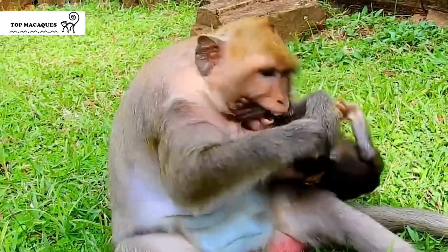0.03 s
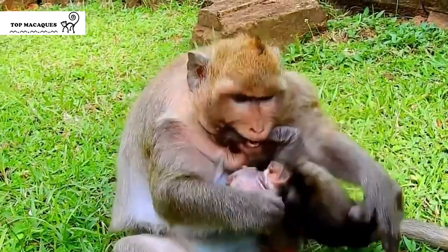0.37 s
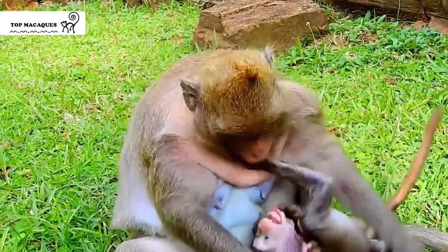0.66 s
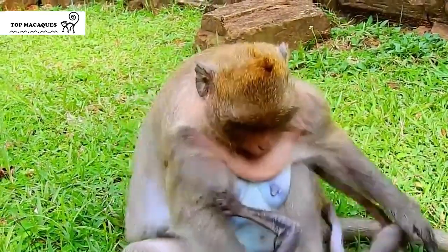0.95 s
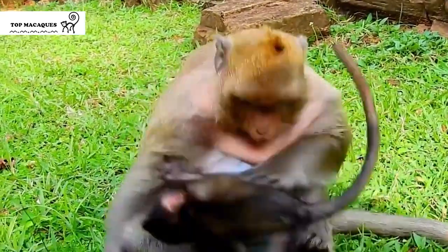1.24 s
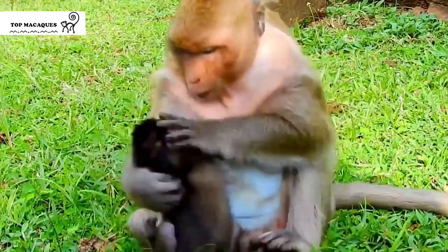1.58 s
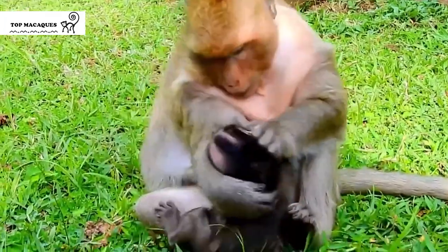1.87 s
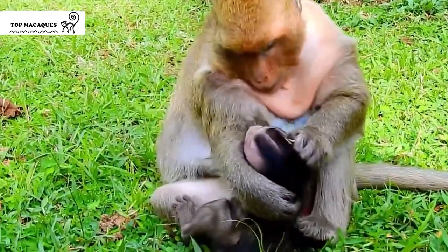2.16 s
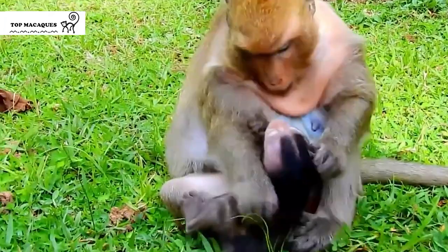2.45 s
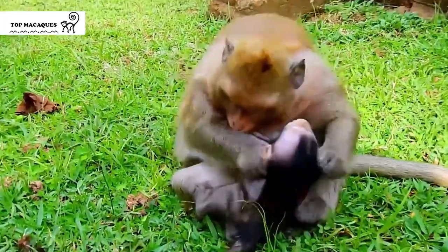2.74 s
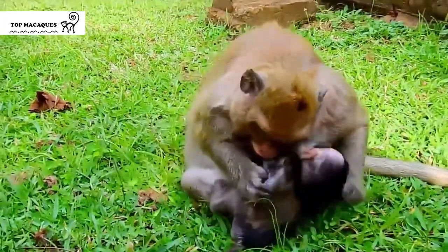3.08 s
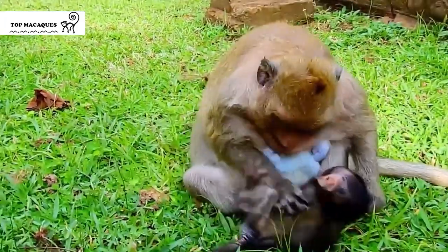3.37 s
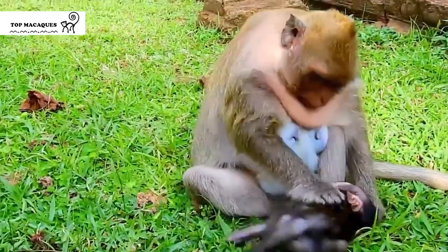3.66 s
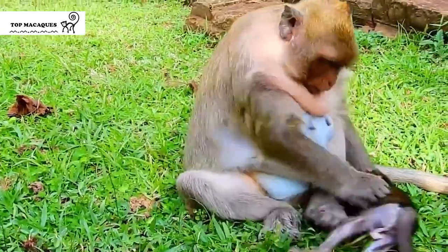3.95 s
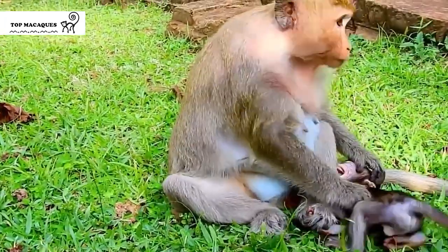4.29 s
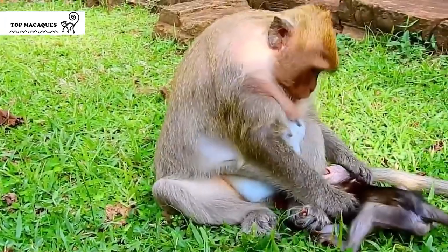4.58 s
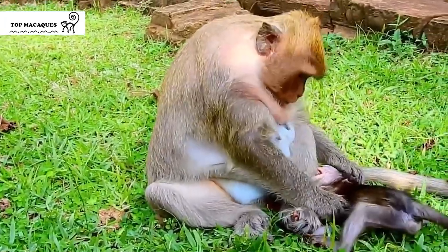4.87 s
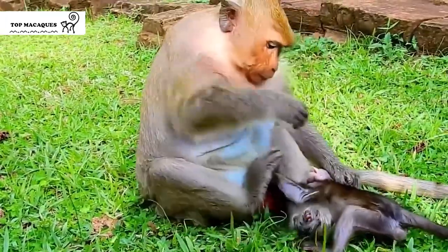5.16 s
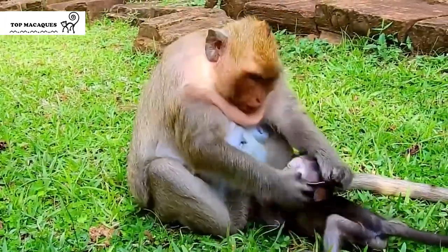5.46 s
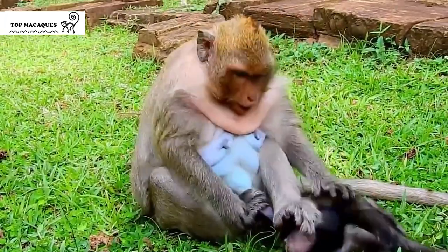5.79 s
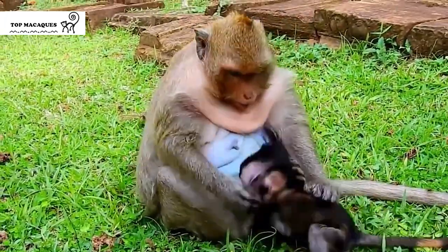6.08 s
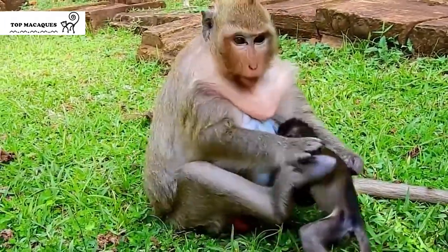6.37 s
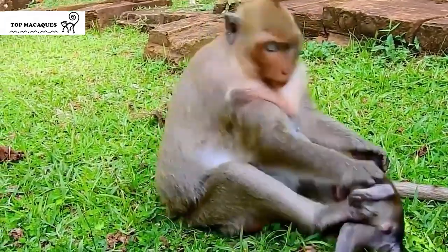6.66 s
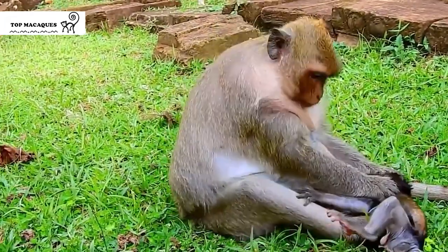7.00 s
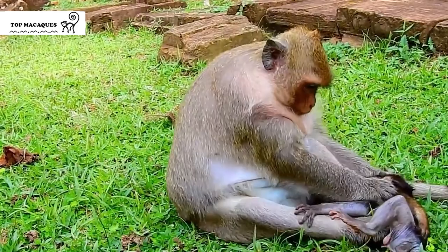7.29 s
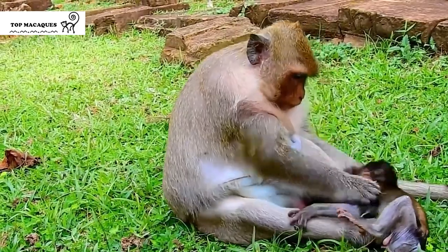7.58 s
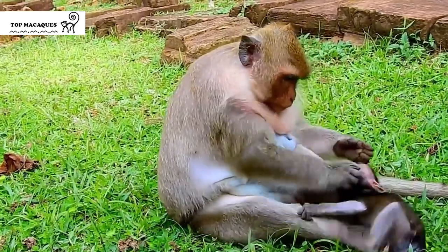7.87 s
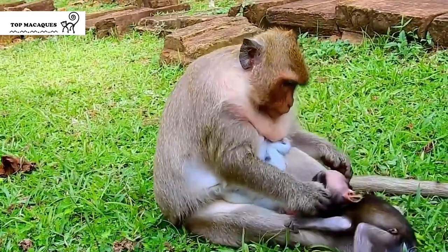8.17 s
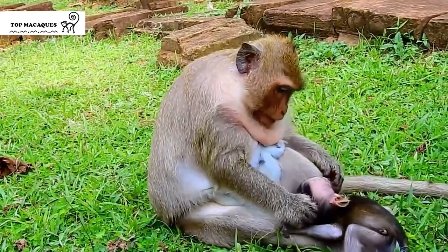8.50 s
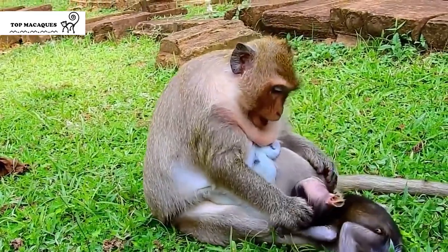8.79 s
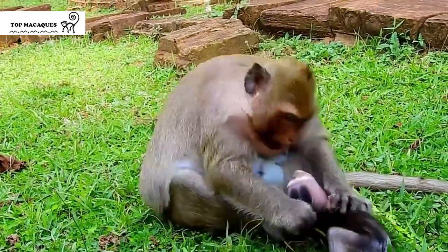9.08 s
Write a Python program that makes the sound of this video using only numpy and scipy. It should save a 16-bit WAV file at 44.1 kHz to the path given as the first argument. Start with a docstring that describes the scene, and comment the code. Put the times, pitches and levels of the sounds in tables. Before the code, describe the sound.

An infant monkey cries nearby outdoors, its piercing, whistle-like squeals and screams wavering in pitch and turning hoarse. The cries come in three bouts with a slight echo, and three dry clicks poke through the first two. The gaps hold a faint low rumble, grass rustle and a few scuffs. Near the end there is a short knock, and the voice dwindles to two small squeaks.

```python
"""An open lawn, close to a stereo microphone: an infant macaque, held down by an adult, squeals and
screams, ending with two small squeaks. Each call is a gliding whistle, loudest in the middle of its
range, that now and then breaks into rasping chaos; the surroundings answer with a short echo.
Behind it are a dull outdoor wash and a few knocks and scuffs, which a limiter ducks under the screams.
Three sharp clicks cut through the calls."""
import sys
import numpy as np
from scipy import signal
from scipy.fft import rfft, irfft
from scipy.io import wavfile
from scipy.ndimage import uniform_filter1d, map_coordinates

SR = 44100
rng = np.random.default_rng(int(sys.argv[2]) if len(sys.argv) > 2 else 0)


def bounce(signal):
    """Save signal as a 16-bit WAV file at the path given by the first command-line argument."""
    frames = np.transpose(np.atleast_2d(signal))
    limited = np.clip(frames, -1, 1)
    pcm = np.round(limited * 32767).astype(np.int16)
    wavfile.write(sys.argv[1], SR, pcm)


N = 411894
TIME = np.arange(N) / SR
OPPOSED = np.array([[1], [-1]])  # left, right


def amp(db):
    """Decibels to gain."""
    return 10 ** (np.asarray(db) / 20)


def unit_rms(x):
    """Scales to rms 1."""
    return x / np.sqrt(np.mean(x ** 2) + 1e-20)


def add(mix, start_s, sound):
    """Mixes a sound in at start_s."""
    part = mix[max(round(start_s * SR), 0):][:len(sound)]
    part += sound[:len(part)]


def coloured_noise(spectrum):
    """Noise shaped by (freq_hz, level_db) points, falling 20 dB an octave beyond them."""
    hz, db = np.transpose(spectrum)
    f = np.fft.rfftfreq(N, 1 / SR) + 1
    octaves_outside = np.maximum(np.log2(f / hz[-1]), 0) + np.maximum(np.log2(hz[0] / f), 0)
    gain = amp(np.interp(np.log(f), np.log(hz), db) - 20 * octaves_outside)
    return unit_rms(irfft(rfft(rng.standard_normal(N)) * gain, N))


def wander(size, rate_hz):
    """Smooth random motion of rms 1, up to about rate_hz."""
    f = np.fft.rfftfreq(size, 1 / SR)
    return unit_rms(irfft(rfft(rng.standard_normal(size)) * (f > 0) / (1 + (f / rate_hz) ** 4), size))


def resonate(x, hz, width_hz):
    """A resonance of gain 1 at hz."""
    turn = np.exp(2j * np.pi * np.cumsum(np.full(len(x), hz)) / SR)
    pole = np.exp(-np.pi * width_hz / SR)
    return 2 * (turn * signal.lfilter([1 - pole], [1, -pole], x / turn)).real


def spread(make, side_db):
    """Two channels from a common part and a weaker opposed part."""
    return make() + amp(side_db) * make() * OPPOSED


# Spectra of the ambience around the microphone: freq_hz, level_db
RUMBLE_SPECTRUM = [(25, -27), (60, -9), (125, 2.5), (200, -7.5), (400, -22.5)]
WASH_SPECTRUM = [(100, -15.5), (260, -6), (750, -1), (1500, -10.5)]
RUSTLE_SPECTRUM = [(500, -17.5), (1000, -2.5), (1400, -1), (2000, -5), (3000, -8), (4300, -32), (7400, -32),
                   (9000, -47.5)]
# Slow swells of the ambience on the lawn: time_s, rumble_db, wash_db, rustle_db
AMBIENCE_SWELLS = [(.3, -48.5, -60, -48.5), (1.44, -55.5, -61.5, -49.5), (2.0, -50, -54, -45.5),
                   (2.602, -50, -50.5, -43), (3.15, -58, -56.5, -45.5), (4.099, -57, -55.5, -53),
                   (4.75, -61.5, -63.5, -64), (5.1, -57, -60.5, -59.5), (5.8, -65, -71.5, -68),
                   (6.699, -64.5, -66.5, -68), (7.4, -48.5, -51.5, -57), (8.0, -60, -68.5, -71.5),
                   (9.1, -62.5, -66, -65)]


def lawn_ambience():
    """Low rumble, a dull wash and an uneven rustle of grass, each swelling slowly, over faint hiss."""
    times, *levels = np.transpose(AMBIENCE_SWELLS)
    rumble_gain, wash_gain, rustle_gain = (amp(np.interp(TIME, times, db)) for db in levels)
    rumble_gain *= amp(2 * wander(N, 4.7) - 1.5)
    rumble = rumble_gain * spread(lambda: coloured_noise(RUMBLE_SPECTRUM), side_db=-25)
    wash_and_rustle = spread(lambda: wash_gain * coloured_noise(WASH_SPECTRUM)
                             + rustle_gain * coloured_noise(RUSTLE_SPECTRUM), side_db=-12)
    flutter = amp(1.8 * wander(N, 13) - 2)
    hiss_spectrum = [(3000, -4.5), (7000, -2), (8500, -22), (13000, -29)]
    hiss = amp(-81.5) * spread(lambda: coloured_noise(hiss_spectrum), side_db=-1.5)
    return rumble + wash_and_rustle * flutter + hiss


def surroundings(x, tail_db, near_db=-11, near_t60_s=.05, tail_t60_s=.31, treble_t60_s=.18):
    """Adds quick scatter from the ground and the bodies, then a thin tail from stones and trees."""
    t = np.arange(SR * 3 // 4) / SR
    echoes = lambda: rng.standard_normal(len(t)) * (rng.random(len(t)) < 3000 / SR) * (t > .001)
    unit_energy = lambda h: h / np.sqrt((h ** 2).sum(-1, keepdims=True))
    near = unit_energy(np.array([echoes(), echoes()]) * amp(-60 * t / near_t60_s))
    hz, when, bands = signal.stft(spread(echoes, side_db=-8), SR, nperseg=256)
    t60_s = np.interp(hz, [6000, 12000], [tail_t60_s, treble_t60_s])[:, None]
    tail = unit_energy(signal.istft(bands * amp(-60 * when / t60_s), SR, nperseg=256)[1][:, :len(t)])
    response = amp(near_db) * near + amp(tail_db) * tail
    return x + signal.fftconvolve(x[None], response, axes=1)[:, :N]


# Knocks and scuffs in the grass, behind the voice: start_s, level_db, centre_hz, width_hz, t60_s
KNOCKS = [(2.433, -35.5, 926, 705, 0.17), (2.492, -35, 1046, 916, 0.14), (4.643, -47, 1680, 1460, 0.12),
          (7.419, -18, 515, 296, 0.04), (7.862, -41, 2930, 2930, 0.082), (7.872, -34.5, 820, 1406, 0.03),
          (8.073, -50.5, 1380, 1383, 0.12), (8.329, -35.5, 2810, 599, 0.024),
          (8.933, -50.5, 1820, 1090, 0.19)]


def knock(start_s, level_db, centre_hz, width_hz, t60_s, rise_s=.00087):
    """A damped puff of contact noise."""
    t = np.arange(SR // 4) / SR
    contact = resonate(rng.standard_normal(len(t)), centre_hz, width_hz)
    body = unit_rms(resonate(contact, centre_hz, width_hz))
    return start_s, body * amp(level_db - 60 * t / t60_s) * (1 - np.exp(-t / rise_s))


# Breaks, where the infant's whistle gives way to rasp: start_s, length_s, roughness
VOICE_BREAKS = [(0.359, .006, 0.6), (0.379, 0.0046, 0.42), (.638, 0.031, .85), (0.818, 0.076, 0.99),
                (0.902, 0.048, 0.88), (1.079, 0.11, 0.9), (1.199, .06, .68), (1.262, .09, 0.88),
                (1.546, .02, 0.7), (3.245, .03, 1.03), (3.31, 0.019, 0.76), (3.363, 0.036, 0.97),
                (3.559, 0.047, 0.77), (3.627, .032, 0.96), (3.755, 0.037, .8), (3.914, 0.069, 0.79),
                (3.993, .055, 0.76), (4.18, .03, 1), (4.458, .1, 0.9), (5.892, .03, 0.58),
                (5.958, 0.091, 0.94), (6.04, .12, .97), (6.16, .06, 0.67), (6.369, .06, .8),
                (6.453, .035, .6), (6.514, 0.073, 0.61), (6.833, .155, 0.63), (7.253, .03, 0.69)]


def voice_breaks(t, edge_s=.01):
    """Roughness at times t: the voice takes edge_s to tip into a break and out again."""
    rough = np.max([depth * ((t >= s) & (t < s + length)) for s, length, depth in VOICE_BREAKS], axis=0)
    return uniform_filter1d(rough, size=round(edge_s * SR))


def effort_db(t, hz, level_db, attack_s, release_s=.021, easy_hz=5480):
    """A call swells, wavers and is choked off, louder in breaks and weaker away from its easy pitch."""
    swell = -20.5 * np.maximum(1 - (t - t[0]) / attack_s, 0)
    release = -25.5 * np.maximum(1 - (t[-1] - t) / release_s, 0)
    push = 2 * voice_breaks(t)
    waver = 1.38 * wander(len(t), 25)
    thinning = np.where(hz > easy_hz, 60, 27) * np.log2(hz / easy_hz) ** 2
    return level_db + swell + release + push + waver - np.minimum(thinning, 31.5)


# What the infant's throat lets through: freq_hz, gain_db
THROAT_RESPONSE = [(4000, -2.5), (6300, 8.5), (7800, -1), (9000, -5), (10500, -12), (12000, -14.5),
                   (15000, -30)]


def rasp(t, pitch_hz, rough, mouth_hz, core_width_hz=800, mouth_width_hz=380):
    """Chaotic vibration: a fuzzy core on the pitch, fleeting sidebands, the mouth's lowest resonance."""
    f, when, bands = signal.stft(rng.standard_normal(len(t) + 256), SR, nperseg=256, noverlap=192)
    f, when = f[:, None] + 1, when + t[0]
    offset_hz = f - np.interp(when, t, pitch_hz)
    chaos, resonance_hz = np.interp(when, t, rough), np.interp(when, t, mouth_hz)
    core_db = 12 * (1 - chaos / 2) * np.exp(-(offset_hz / core_width_hz) ** 2 / 2)
    mouth_db = 9 * chaos * np.exp(-((f - resonance_hz) / mouth_width_hz) ** 2)
    # under that resonance the rasp drops steeply to a faint shelf
    cut_db = np.clip(110 * np.log2((resonance_hz - mouth_width_hz) / f), 0, 37)
    # sidebands ride with the pitch, each some 450 Hz wide and 20 ms long
    grid = np.broadcast_arrays(offset_hz / 450, when / .02)
    sideband_db = 8.5 * map_coordinates(rng.standard_normal((64, 64)), grid, order=3, mode="grid-wrap")
    shape_db = np.interp(f, *np.transpose(THROAT_RESPONSE)) + core_db + mouth_db - cut_db + sideband_db
    noise = signal.istft(bands * amp(shape_db), SR, nperseg=256, noverlap=192)[1][:len(t)]
    steady = noise / np.sqrt(abs(uniform_filter1d(noise ** 2, size=400)) + 1e-20)
    sputter = amp(1.5 * wander(len(t), 1100))
    return unit_rms(steady * sputter)


def cry(t, hz, mouth_hz, level_db, attack_s, hoarseness, overtone_db, doubling_db):
    """The vocal folds whistle, jitter, double their period and break into a sputtering rasp."""
    size = len(t)
    rough = np.clip(np.maximum(hoarseness, voice_breaks(t)), 0, 1)
    quaver = .011 * wander(size, 75)
    jitter = rough * (.05 * wander(size, 500) + .076 * wander(size, 110))
    phase = 2 * np.pi * np.cumsum(hz * (1 + quaver + jitter)) / SR
    throat_db = np.interp(2 * hz, *np.transpose(THROAT_RESPONSE))
    overtone = amp(overtone_db + throat_db + 2 * wander(size, 50)) * np.sin(2 * phase)
    shimmer = amp(3 * wander(size, 83))
    whistle = shimmer * np.sin(phase) + overtone
    # when half the pitch meets the mouth's resonance, cycles alternate strong and weak
    mistuning = (hz / 2 - mouth_hz) / 550
    doubling = amp(doubling_db) * np.exp(-mistuning ** 2) * (1 + wander(size, 490)) / 2
    whistle += doubling * (np.sin(phase / 2) + .3 * np.sin(1.5 * phase))
    voice = np.sqrt(1 - rough ** 2) * unit_rms(whistle) + rough * rasp(t, hz, rough, mouth_hz)
    fades = signal.windows.tukey(size, min(.007 * SR / size, 1))
    return t[0], voice * amp(effort_db(t, hz, level_db, attack_s)) * fades


# Short squeals near the microphone: start_s, length_s, level_db, attack_s, top_hz, end_hz, overtone_db
SQUEALS = [(0.298, 0.033, -30, 0.0046, 6500, 5000, -19), (0.42, 0.033, -20, 0.0038, 4630, 3950, -10.5),
           (0.613, 0.07, -19.5, 0.0025, 6360, 4720, -12.5), (0.81, 0.08, -13.5, 0.024, 5946, 4390, -18.5),
           (0.898, .05, -4, .004, 6300, 4200, -17), (1.469, 0.1, -7.5, 0.071, 6990, 4657, -8),
           (3.17, 0.032, -19, .012, 6290, 5680, -9), (5.863, 0.037, -15, 0.0067, 6950, 6170, -9.5),
           (7.215, 0.063, -12.5, 0.031, 5360, 3970, -16), (8.009, 0.046, -44, 0.012, 6220, 5660, -26),
           (9.187, 0.041, -35, 0.018, 5490, 4300, -6)]


def squeal(start_s, length_s, level_db, attack_s, top_hz, end_hz, overtone_db, rounding=.16):
    """One arch of pitch: it crests as the effort builds and sinks steadily as the air runs out."""
    t = np.arange(0, length_s, 1 / SR)
    crest = min(.46 * attack_s / length_s, .5)
    sag = np.hypot(t / length_s - crest, rounding) - rounding
    hz = top_hz - (top_hz - end_hz) * sag / sag[-1]
    mouth_hz = np.full(len(t), 4350)
    return cry(start_s + t, hz, mouth_hz, level_db, attack_s,
               hoarseness=.11, overtone_db=overtone_db, doubling_db=-12.5)


# Wavering screams near the microphone: level_db, attack_s, hoarseness, doubling_db,
# mouth_path [(time_s, resonance_hz)], pitch_turns [(time_s, pitch_hz)]
SCREAMS = [(-2.5, .045, 0.052, -21.5, [(.35, 4510)], [(.328, 5260), (.35, 5410), (.375, 4850), (.398, 5340),
           (.414, 4340)]), (-8, .004, .12, -16, [(1.13, 4120), (1.33, 3670)], [(1.035, 5900), (1.06, 4315),
           (1.077, 4850), (1.083, 5570), (1.165, 6140), (1.19, 4166), (1.207, 6610), (1.32, 4353),
           (1.356, 4400)]), (2, .05, .3, -18.5, [(3.2, 4380), (3.43, 4760)], [(3.193, 6200), (3.213, 6750),
           (3.285, 5530), (3.303, 6500), (3.34, 5700), (3.365, 6770), (3.428, 5546), (3.447, 4200)]),
           (-2.5, .04, 0.26, -24, [(3.97, 5000), (4.02, 3870)], [(3.56, 7270), (3.62, 7650), (3.64, 6770),
           (3.77, 6000), (3.82, 6520), (3.85, 7660), (3.91, 8657), (3.985, 8400), (4.06, 6370),
           (4.13, 7600), (4.177, 7400), (4.212, 4330)]), (-3.5, 0.0828, 0.081, -8, [(4.4, 4520),
           (4.53, 4100)], [(4.337, 8300), (4.38, 7630), (4.405, 8770), (4.435, 7910), (4.47, 6300),
           (4.51, 5500), (4.54, 4190), (4.562, 4490)]), (-8.5, 0.0018, .38, -10, [(5.95, 4025),
           (6.07, 3960), (6.28, 3800), (6.41, 3470), (6.54, 4127)], [(5.888, 6415), (5.92, 6370),
           (5.943, 5560), (6.01, 7160), (6.08, 5760), (6.17, 6190), (6.21, 5000), (6.252, 5500),
           (6.275, 6950), (6.305, 6690), (6.335, 4326), (6.38, 6280), (6.435, 5820), (6.466, 8240),
           (6.495, 5960), (6.528, 7300), (6.58, 6040)]), (-4.5, 0.00405, 0.085, -16, [(6.78, 3530),
           (6.86, 5180)], [(6.714, 8100), (6.732, 8580), (6.753, 7330), (6.787, 7940), (6.81, 6130),
           (6.84, 5920), (6.9, 6520), (6.994, 6500)])]


def scream(level_db, attack_s, hoarseness, doubling_db, mouth_path, pitch_turns, overtone_db=-18):
    """The pitch swoops between turning points while the mouth slowly changes shape."""
    times, turns_hz = np.transpose(pitch_turns)
    t = np.arange(times[0], times[-1], 1 / SR)
    hz = np.interp(t, times, turns_hz)
    mouth_hz = np.interp(t, *np.transpose(mouth_path))
    return cry(t, hz, mouth_hz, level_db, attack_s, hoarseness, overtone_db, doubling_db)


# How far the left side of the microphone leads on the voice: freq_hz, lead_rad
LEFT_LEAD = [(3000, .1), (8800, .5), (12000, 1.4)]


def stereo_microphone(voice):
    """The two capsules hear the voice slightly out of step."""
    lead_rad = np.interp(np.fft.rfftfreq(N, 1 / SR), *np.transpose(LEFT_LEAD))
    return irfft(rfft(voice) * np.exp(.5j * lead_rad * OPPOSED), N)


def scene(voice_db=4.5, lowest_hz=2100):
    """The infant close by, twisting from side to side, and the scuffle on the open lawn."""
    voice, scuffle = np.zeros(N), np.zeros(N)
    for row in SQUEALS:
        add(voice, *squeal(*row))
    for row in SCREAMS:
        add(voice, *scream(*row))
    for row in KNOCKS:
        add(scuffle, *knock(*row))
    # the small throat radiates no lows
    voice = signal.sosfilt(signal.butter(10, lowest_hz, "highpass", fs=SR, output="sos"), voice)
    infant = stereo_microphone(surroundings(voice, tail_db=-27))
    sway_db = .65 * (wander(N, 1.9) - .5) * OPPOSED
    return infant * amp(voice_db + sway_db) + surroundings(scuffle, tail_db=-11) + lawn_ambience()


# Sharp, dry clicks at the height of some calls: time_s, level_db
CLICKS = [(.836, -4.5), (1.208, -3), (3.637, -3.5)]


def record(dry, threshold_db=-13, recovery_db_per_s=340, slope=.96, cutoff_hz=15500):
    """A fast limiter flattens the screams and ducks all else; clicks join before the treble is cut."""
    power_db = 10 * np.log10(abs(uniform_filter1d((dry ** 2).mean(0), size=40)) + 1e-12)
    recovery_db = TIME * recovery_db_per_s
    held_db = np.maximum.accumulate(power_db + recovery_db) - recovery_db
    over_db = np.maximum(held_db - threshold_db, 0)
    limited = dry * amp(-slope * uniform_filter1d(uniform_filter1d(over_db, size=60), size=60))
    clicks = np.zeros(N)
    for time_s, level_db in CLICKS:
        add(clicks, time_s, amp([level_db]))
    lowpass = signal.firwin(301, cutoff_hz, window=("kaiser", 9), fs=SR)
    return signal.oaconvolve(limited + clicks, lowpass[None], "same")


dry = scene()
out = record(dry)
bounce(out)
```